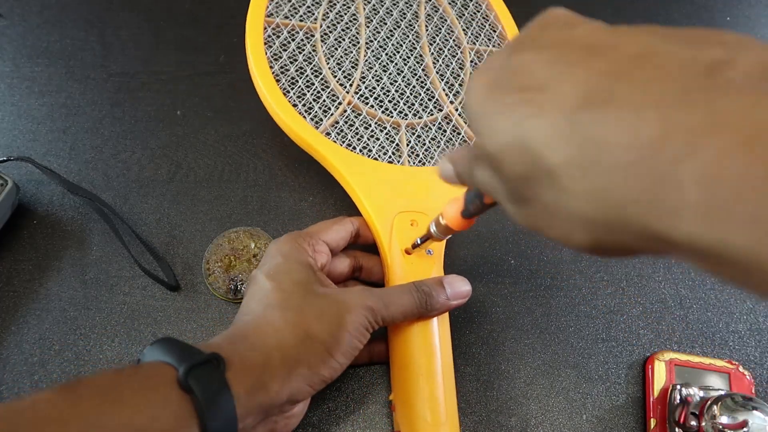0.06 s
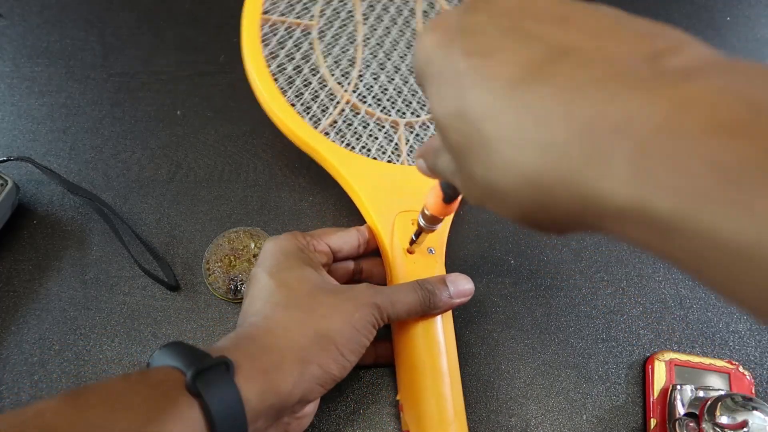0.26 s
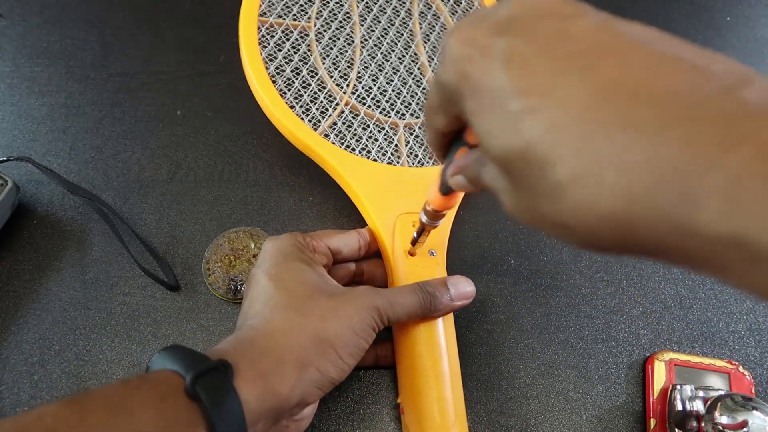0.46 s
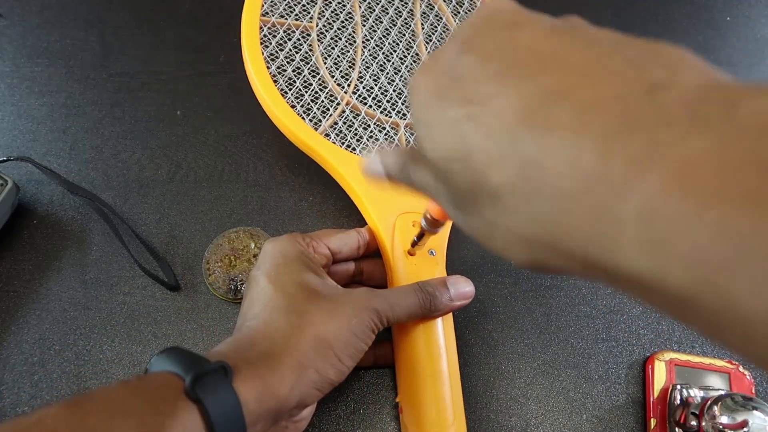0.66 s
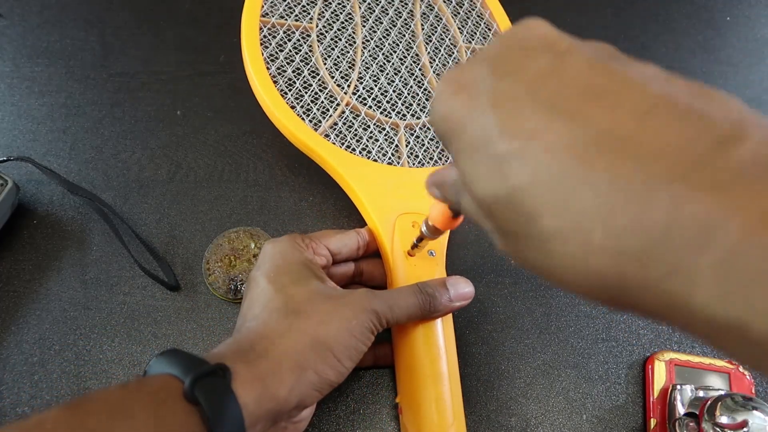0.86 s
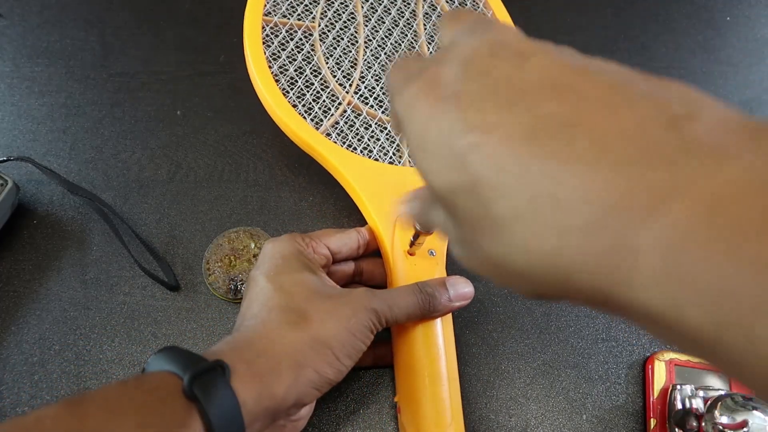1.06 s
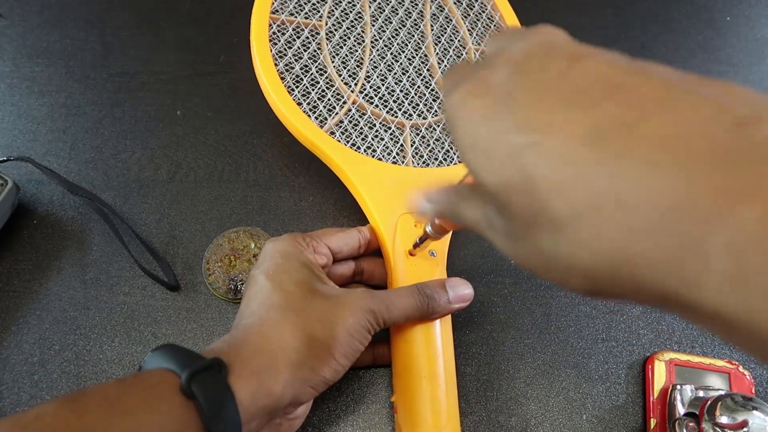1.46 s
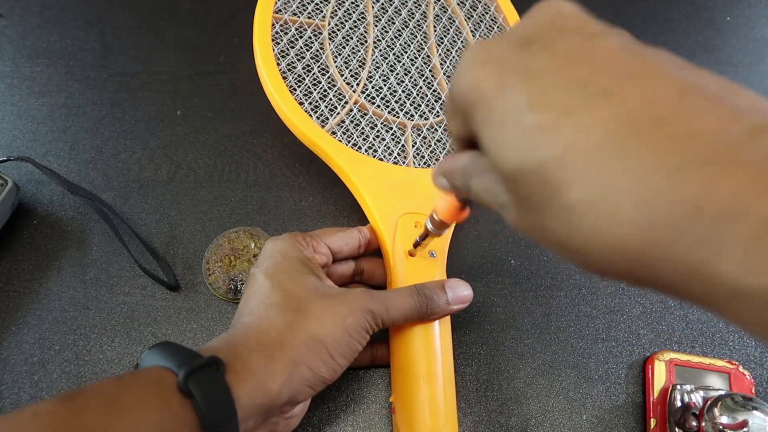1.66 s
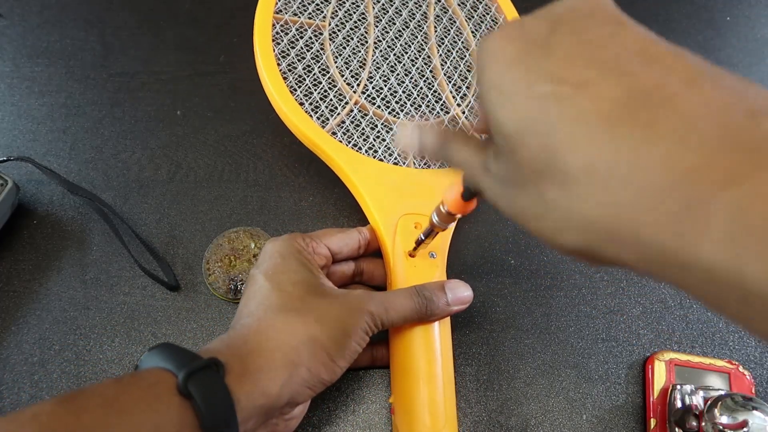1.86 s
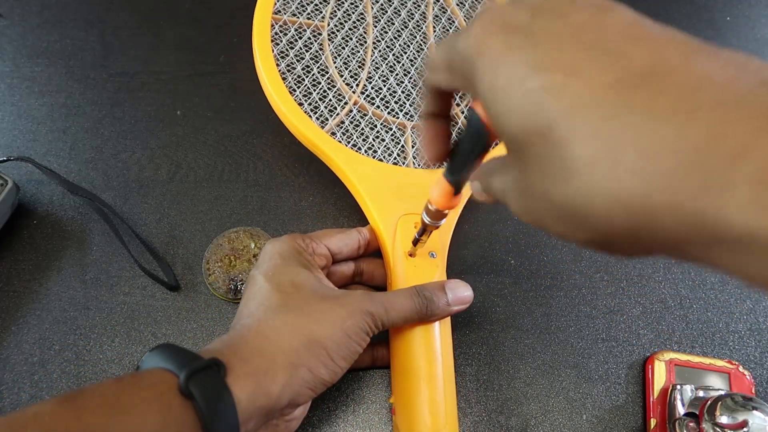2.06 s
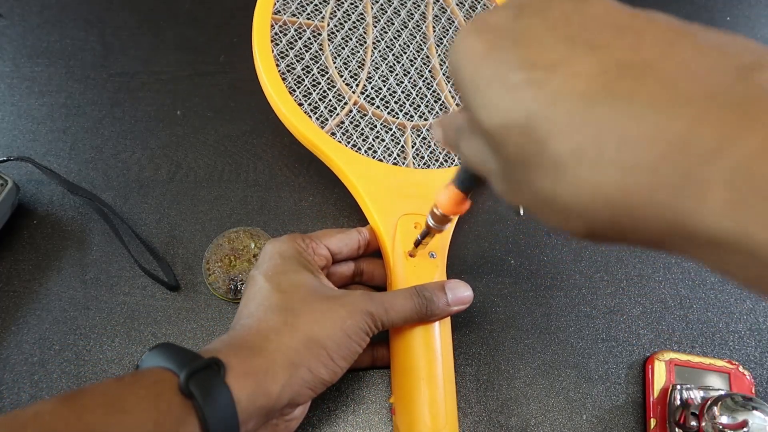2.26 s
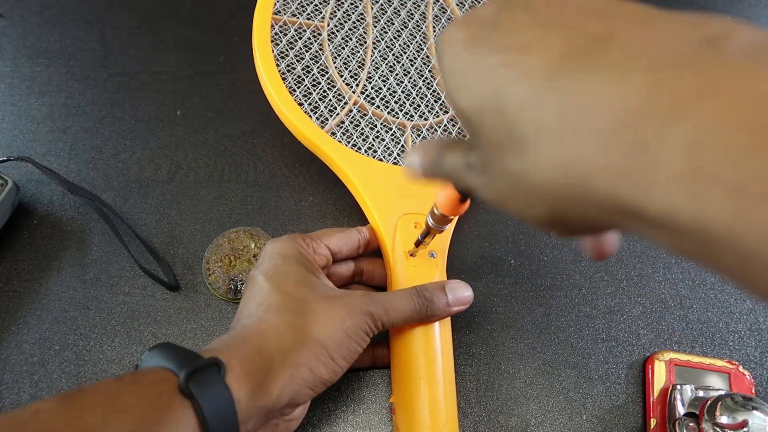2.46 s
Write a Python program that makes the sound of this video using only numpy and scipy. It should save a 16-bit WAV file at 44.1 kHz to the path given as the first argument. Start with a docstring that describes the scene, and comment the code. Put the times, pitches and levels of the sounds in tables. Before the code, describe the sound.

A screwdriver clicking in a screw, with a few knocks of plastic on a table.

```python
"""A quiet room, a stereo pair of microphones close to a table. A small screwdriver turns a screw in a
hollow plastic handle held on the table top. The bit clicks in the screw head at each new grip; early on
the handle knocks on the table, judders and groans, and the bit slips with a snap. Fingers and thread
rub between the clicks, and the contacts set table and room ringing low over a faint room tone."""
import sys
import numpy as np
from scipy import signal
from scipy.fft import rfft, irfft
from scipy.io import wavfile
from scipy.ndimage import uniform_filter1d

SR = 44100
rng = np.random.default_rng(int(sys.argv[2]) if len(sys.argv) > 2 else 0)


def bounce(signal):
    """Save signal as a 16-bit WAV file at the path given by the first command-line argument."""
    frames = np.transpose(np.atleast_2d(signal))
    limited = np.clip(frames, -1, 1)
    pcm = np.round(limited * 32767).astype(np.int16)
    wavfile.write(sys.argv[1], SR, pcm)


N = 110250
TIME = np.arange(N) / SR
FREQS = np.fft.rfftfreq(N, 1 / SR)


def blows():
    """The bit clicks in the screw and slips once, the handle knocks; the table thuds under both."""
    # (time [s], thud [dB], clack [dB], tick [dB], casing pitch [Hz], tick ring [Hz])
    clicks = [(0.0334,-31.5,-29,-34.5,1227,2140), (0.6952,-22,-24.5,-35,1296,3250),
              (1.064,-24.5,-31,-45,1210,2120), (1.3444,-36.5,-39,-39.5,1740,5340),
              (1.4484,-31,-39,-46.5,1290,2530), (1.483,-28.5,-37.5,-69,1230,1900),
              (1.547,-67,-47.5,-53.5,1270,3460), (1.6584,-33.5,-42.5,-45.5,1230,1950),
              (1.6657,-42,-32.5,-52,1220,2390), (1.763,-67,-71,-50.5,1290,6840),
              (1.8354,-28.5,-39,-58,1250,1250), (1.8396,-43,-46,-48,1290,4080),
              (2.0354,-37,-37.5,-39.5,1224,5090), (2.127,-46,-48,-47.5,1300,6200),
              (2.2096,-25.5,-31.5,-46.5,1340,6800), (2.452,-34,-40,-52,1350,1860)]
    # the handle bumps the table: (time [s], thud [dB], dull casing knock [dB])
    knocks = [(0.2256, -12, -27), (0.252, -20.5, -31), (0.386, -17.5, -36), (0.414, -14.5, -36),
              (0.441, -18.5, -32), (0.496, -18, -37.5), (0.942, -30.5, -47), (1.392, -30, -53)]
    # spectrum of the casing knock: (frequency [Hz], level [dB])
    knock_colour = [(400, -17.5), (750, -5), (1000, 2.5), (1500, -7), (3000, -17), (9000, -45)]
    thud_lag_s = 0.001
    out = np.zeros(N)
    for start, thud_db, clack_db, tick_db, casing_hz, tick_hz in clicks:
        add_blow(out, start + thud_lag_s, thud_db, table_thud())
        add_blow(out, start, clack_db, casing_clack(casing_hz))
        add_blow(out, start, tick_db, bit_tick(tick_hz))
    for start, thud_db, knock_db in knocks:
        add_blow(out, start + thud_lag_s, thud_db, table_thud())
        add_blow(out, start, knock_db, crack(knock_colour, t60=0.086))
    add_blow(out, start=0.4229, db=-20.5, sound=bit_snap())
    return out


def bit_tick(hz):
    """Metal on metal: a bright crack with one ring that depends on how the bit sits."""
    # spectrum of the crack: (frequency [Hz], level [dB])
    tick_colour = [(1000, 1.5), (2500, -4.5), (4200, 0.5), (6500, -4), (12500, -16.5), (16000, -41)]
    metal_ring = rms_one(ring([(hz, 0, 0.012)], size=4096))
    return crack(tick_colour, t60=0.039) + from_db(-5.5) * metal_ring


def bit_snap():
    """The bit skids over the edge of its slot: a short rasp that sets the shaft ringing."""
    # spectrum of the skid: (frequency [Hz], level [dB])
    skid_colour = [(1000, -2), (2500, -9.5), (4500, -0.5), (7200, 0.5), (10000, -3), (11800, 2.5),
                   (16000, -9.5)]
    # shaft modes: (frequency [Hz], level [dB], t60 [s])
    shaft_modes = [(1427, -2, 0.011), (3300, -8, 0.01), (4160, -3, 0.011), (5430, -6.5, 0.0086),
                   (7040, -5, 0.0074)]
    skid_s, rise_s = 0.0048, 0.0024
    t = TIME[:4096]
    skid = rng.standard_normal(len(t)) / (1 + (t / skid_s) ** 4)
    shaft = ring(shaft_modes, size=len(t)) * np.minimum(t / rise_s, 1)
    return from_db(0.5) * rms_one(colour(skid, skid_colour)) + rms_one(shaft)


def casing_clack(hz):
    """The hollow casing: one mode set by the grip, a higher one and a dense crack."""
    # upper casing mode: (frequency [Hz], level [dB], t60 [s])
    upper_mode = [(1993, -7, 0.0096)]
    # spectrum of the crack: (frequency [Hz], level [dB])
    clack_colour = [(550, -7), (1200, -3.5), (3000, -9.5), (5000, -18.5), (9000, -31.5), (16000, -34)]
    shell = ring([(hz, 0, 0.016), *upper_mode], size=4096, vary_db=2)
    return rms_one(shell) + from_db(-2) * crack(clack_colour, t60=0.054)


def table_thud():
    """The table top under a soft blow; it radiates little below its first mode."""
    # table top modes: (frequency [Hz], level [dB], t60 [s])
    table_modes = [(132, -7.5, 0.083), (191, 0, 0.012), (314.4, -1.5, 0.032), (337.6, -5, 0.044)]
    radiated_band = signal.butter(2, [131.6, 776], "band", fs=SR, output="sos")
    return signal.sosfilt(radiated_band, ring(table_modes, size=8192, vary_db=2))


def dragging():
    """The handle judders on the table; where it catches, the slips lock into a short, wavering tone."""
    # strength of the judder: (time [s], level [dB])
    judder_levels = [(0, -42.5), (.2, -60), (.33, -33.5), (.39, -19), (.44, -27), (.53, -27), (.62, -45),
                     (.84, -51), (.9, -35), (1.0, -47.5), (1.12, -36.5), (1.25, -49), (1.45, -41.5),
                     (1.6, -57.5), (1.85, -44.5), (2.0, -52.5), (2.18, -43), (2.33, -50.5)]
    # its spectrum: (frequency [Hz], level [dB])
    judder_colour = [(65, -60.5), (95, -24.5), (140, 4), (200, -0.5), (255, -5.5), (320, 0), (430, -18.5),
                     (650, -36), (1100, -24), (10000, -78)]
    # groans and squeaks: (start [s], rise [s], t60 [s], pitch [Hz], level [dB])
    groans = [(0.374, 0.019, 0.44, 778, -34.5), (0.365, .04, 0.094, 330, -19.5),
              (2.452, 0.0025, 0.21, 300, -27.5)]
    judder_gain = from_db(np.interp(TIME, *np.transpose(judder_levels)))
    out = judder_gain * friction(judder_colour, per_s=900, spread_db=2.5)
    for start, rise, t60, hz, db in groans:
        t = np.maximum(TIME - start, 0)
        envelope = np.minimum(t / rise, 1) * from_db(db - 60 * np.maximum(t - rise, 0) / t60)
        waver = rms_one(uniform_filter1d(rng.standard_normal(N), size=800))
        pitch = hz * (1 + 0.014 * waver)
        out += envelope * np.sin(2 * np.pi * np.cumsum(pitch * (t > 0)) / SR)
    return out


def rubbing():
    """Fingers and thread: each turn is a swell of gritty slips. A faint, high hiss swells once, briefly."""
    # rubs of the turns, and one short rebound of the handle at 0.755 s: (middle [s], length [s], level [dB])
    rubs = [(0.022, 0.083, -48), (0.415, 0.063, -42.5), (0.755, 0.017, -45.5), (0.894, 0.034, -48.5),
            (1.042, 0.035, -46), (1.445, 0.022, -41.5), (1.809, 0.052, -54), (2.164, 0.054, -48),
            (2.378, 0.015, -40.5), (2.435, 0.025, -45)]
    # their spectrum: (frequency [Hz], level [dB])
    rub_colour = [(400, 4.5), (750, -17), (1250, 3), (2300, -2.5), (4500, -7), (8000, -18.5), (12500, -28),
                  (15000, -43)]
    # the swell of high hiss: (middle [s], length [s], level [dB])
    hiss_swell = (2, 0.091, -59.5)
    # its spectrum: (frequency [Hz], level [dB])
    hiss_colour = [(2000, -13), (7000, -10), (15000, -10)]
    steady_grip_db = -61
    turns = sum(swell(*rub) for rub in rubs)
    grit = (from_db(steady_grip_db) + turns) * friction(rub_colour, per_s=1800, spread_db=1.5)
    return grit + swell(*hiss_swell) * friction(hiss_colour, per_s=4400, spread_db=5)


def direct_sound(x):
    """Direct sound reaches the two microphones more and more out of step towards the treble."""
    # (frequency [Hz], phase between the microphones [rad])
    phase_gap = [(1000, 0), (5500, 0.67), (10000, 1.63)]
    phase = at_hz(phase_gap, FREQS)
    return irfft(rfft(x) * np.exp(0.5j * phase * np.array([[1], [-1]])), N)


def room(contacts, sliding, directions=3):
    """A blow sounds a little different in each direction; the walls blend these; standing waves ring on."""
    # standing waves: (frequency [Hz], relative level [dB], t60 [s])
    room_modes = [(142.6, -1, .5), (180.4, 2, .5), (213, 0, .4), (253, -3, .45), (298, -5, .35),
                  (314, -6, .35), (337, -2, .4), (942, 2, .4)]
    tail = sum(reflections(blows() + sliding) for _ in range(directions)) / np.sqrt(directions)
    return tail + convolve(contacts, from_db(-60.5) * ring(room_modes, size=SR))


def reflections(x):
    """The walls return a diffuse tail that builds quickly and lingers longest around 4 kHz."""
    # decay of the room: (frequency [Hz], t60 [s])
    room_t60 = [(150, 0.29), (1000, 0.29), (4000, 0.54), (12000, 0.32)]
    # tone of the tail: (frequency [Hz], gain [dB])
    room_colour = [(100, -15), (300, -9), (600, 0.5), (1500, -0.5), (11000, -2), (15000, -17)]
    first_echo_s, build_s = 0.0018, 0.017
    noise = rfft(diffuse_noise())
    centres = np.geomspace(125, 16000, 6)
    tail = 0
    for centre, weights in zip(centres, np.eye(len(centres))):
        band = irfft(noise * at_hz(np.c_[centres, weights], FREQS), N)
        tail = tail + band * from_db(-60 * TIME / at_hz(room_t60, centre))
    onset = np.clip((TIME - first_echo_s) / build_s, 0, 1)
    response = rms_one(tail * onset) / np.sqrt(N)
    return convolve(x, from_db(-3) * colour(response[:, :SR], room_colour))


def room_tone():
    """Still air: a faint, low, steady noise from all around the microphones."""
    # spectrum of the air: (frequency [Hz], level [dB])
    air_colour = [(15, -48), (25, -15), (58, -13), (155, -1.5), (703, -18.5), (1260, -22), (1560, -28),
                  (12900, -44.5), (14000, -52)]
    return from_db(-46) * rms_one(colour(diffuse_noise(), air_colour))


def diffuse_noise():
    """White noise at the two microphones, alike in the bass and unrelated in the treble."""
    # (frequency [Hz], left-right correlation [0 to 1])
    likeness = [(100, .999), (300, 0.96), (700, 0.68), (1400, 0.85), (2800, 0.56), (12000, 0.017)]
    alike = at_hz(likeness, FREQS)
    mid, side = rfft(rng.standard_normal((2, N)))
    return irfft(np.sqrt((1 + alike) / 2) * mid + np.sqrt((1 - alike) / 2) * side * [[1], [-1]], N)


def ring(modes, size, vary_db=0):
    """Decaying sines of alternating sign; vary_db scatters how hard each is struck."""
    t = TIME[:size]
    out = np.zeros(size)
    for k, (hz, db, t60) in enumerate(modes):
        envelope = from_db(db + vary_db * rng.standard_normal() - 60 * t / t60)
        out += (-1) ** k * envelope * np.sin(2 * np.pi * hz * t)
    return out


def crack(spectrum, t60, size=4096):
    """A noise burst standing for countless fast-dying modes; rms 1."""
    burst = rng.standard_normal(size) * from_db(-60 * TIME[:size] / t60)
    return rms_one(colour(burst, spectrum))


def friction(spectrum, per_s, spread_db):
    """Tiny random slips of uneven size; rms 1."""
    sizes = from_db(spread_db * np.minimum(rng.exponential(1, N), 4)) * rng.standard_normal(N)
    slips = rng.random(N) < per_s / SR
    return rms_one(colour(sizes * slips, spectrum))


def swell(middle, length, db):
    """A bell-shaped rise and fall of gain."""
    return from_db(db) * np.exp(-(2 * (TIME - middle) / length) ** 2)


def add_blow(out, start, db, sound, blow_s=0.004):
    """Place one blow; its level is its energy spread over blow_s."""
    i = int(start * SR)
    gain = from_db(db) * np.sqrt(blow_s * SR / np.sum(sound ** 2))
    out[i:i + len(sound)] += gain * sound[:N - i]


def colour(x, spectrum):
    """Causal (minimum-phase) filter with the given spectrum."""
    n = x.shape[-1]
    gain = from_db(at_hz(spectrum, np.fft.rfftfreq(2 * n, 1 / SR)))
    cepstrum = irfft(np.log(gain))
    cepstrum[1:n] *= 2
    cepstrum[n + 1:] = 0
    return irfft(rfft(x, 2 * n) * np.exp(rfft(cepstrum)))[..., :n]


def convolve(x, response):
    """Pass a mono sound through one response per channel."""
    return signal.fftconvolve(x[None], np.atleast_2d(response), axes=1)[:, :N]


def at_hz(points, hz):
    """Read a table on a log-frequency axis."""
    freqs, values = np.transpose(points)
    return np.interp(np.log(hz + 1e-3), np.log(freqs), values)


def from_db(db):
    """Decibels to gain."""
    return 10 ** (np.asarray(db) / 20)


def rms_one(x):
    """Scale to rms 1."""
    return x / np.sqrt(np.mean(x ** 2) + 1e-20)


def scene():
    """Blows and friction close to the microphones, the room behind them, room tone underneath."""
    sliding = rubbing() + dragging()
    contacts = blows() + sliding
    return direct_sound(contacts) + room(contacts, sliding) + room_tone()


def record(dry):
    """A steep low-pass cuts the top: 70 dB down from 16.5 kHz."""
    return signal.sosfilt(signal.cheby2(14, 70, 16500, fs=SR, output="sos"), dry)


dry = scene()
out = record(dry)
bounce(out)
```